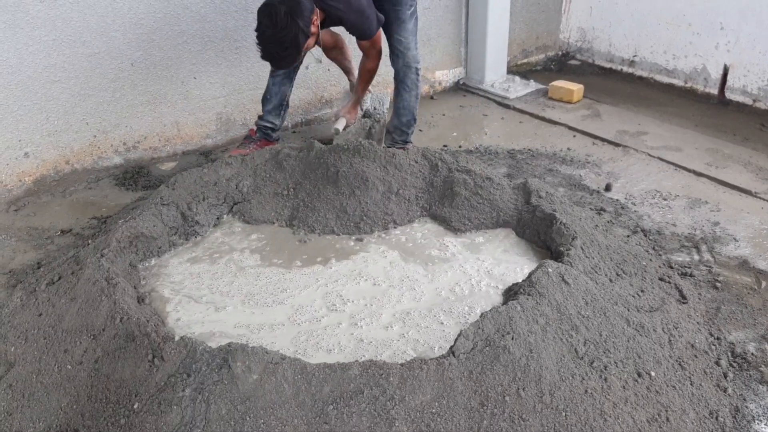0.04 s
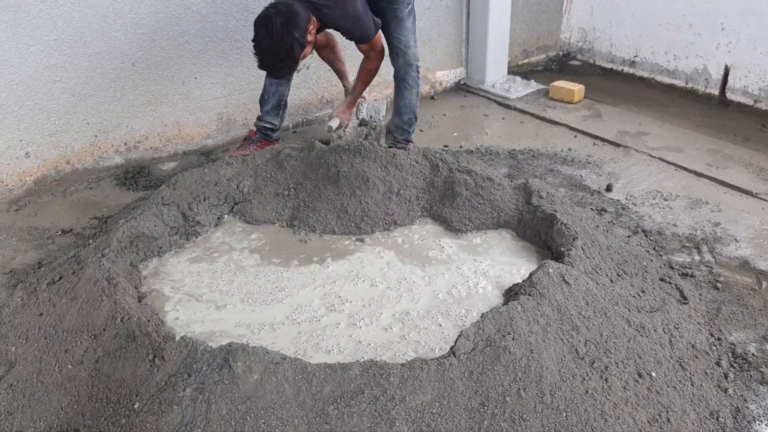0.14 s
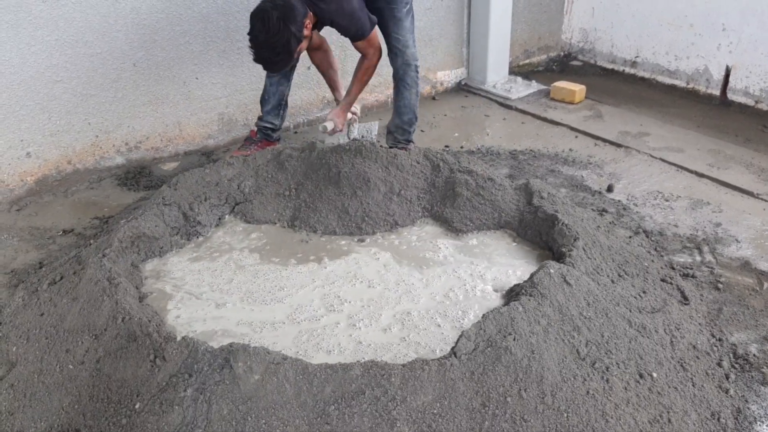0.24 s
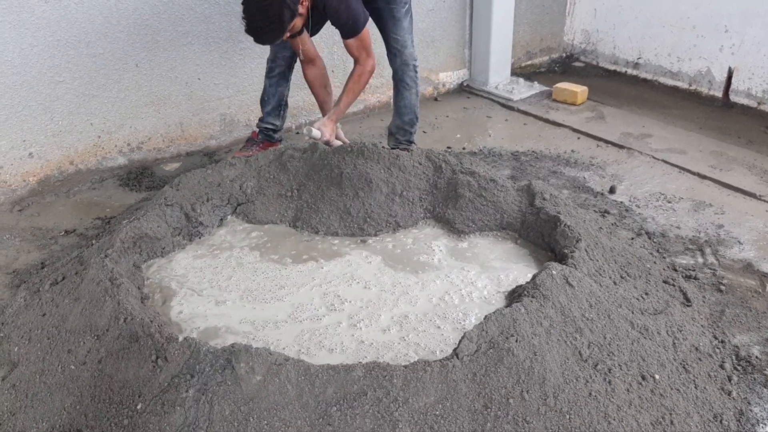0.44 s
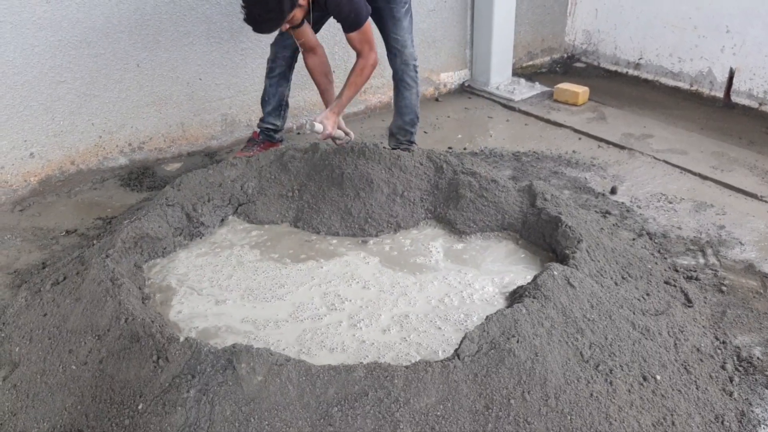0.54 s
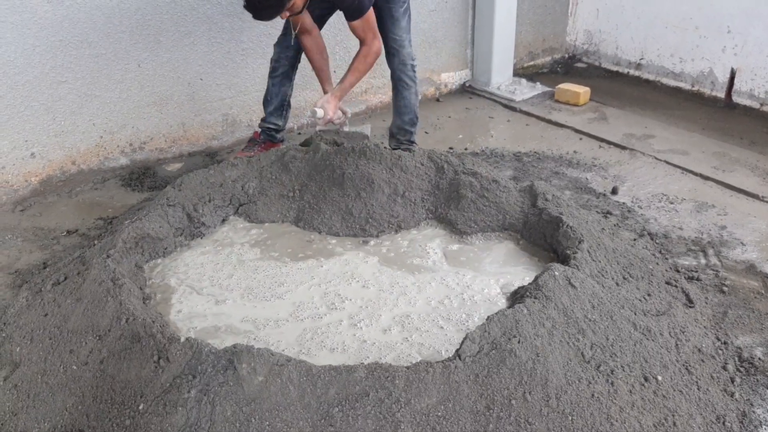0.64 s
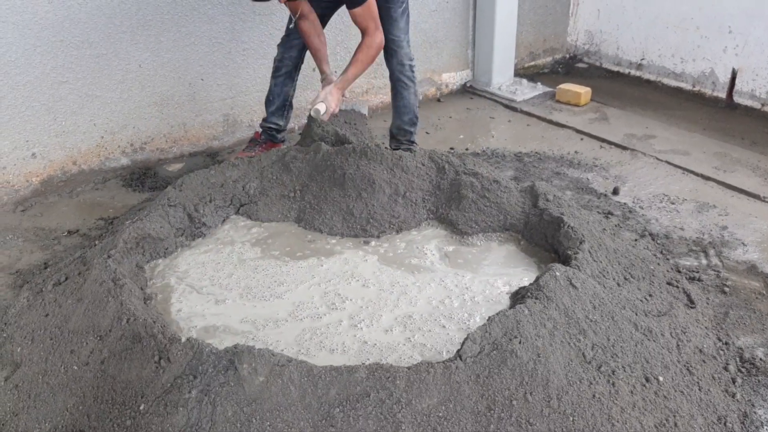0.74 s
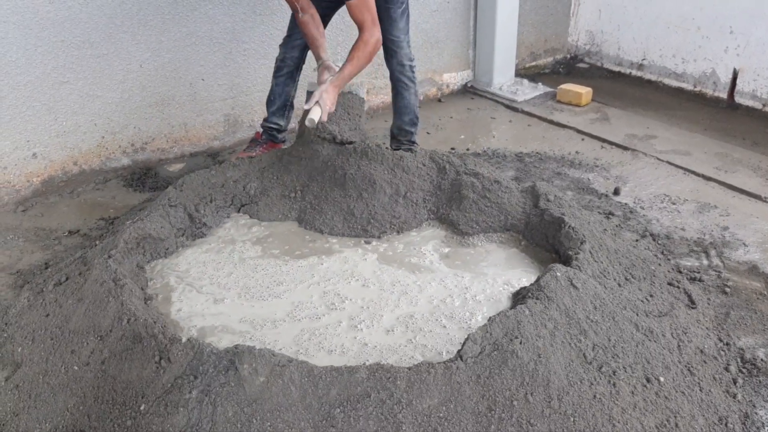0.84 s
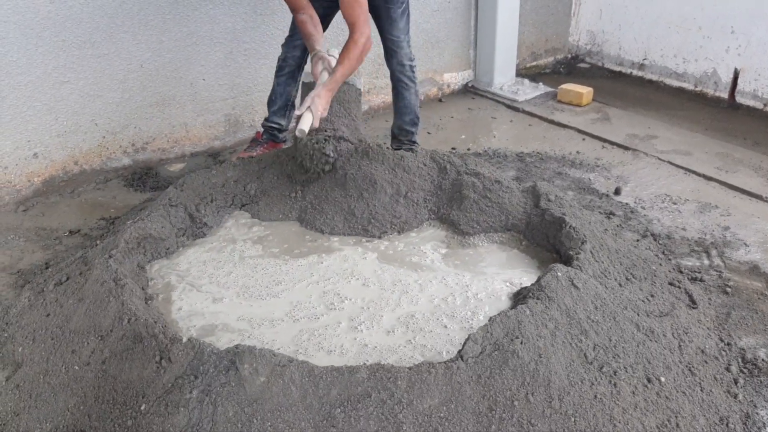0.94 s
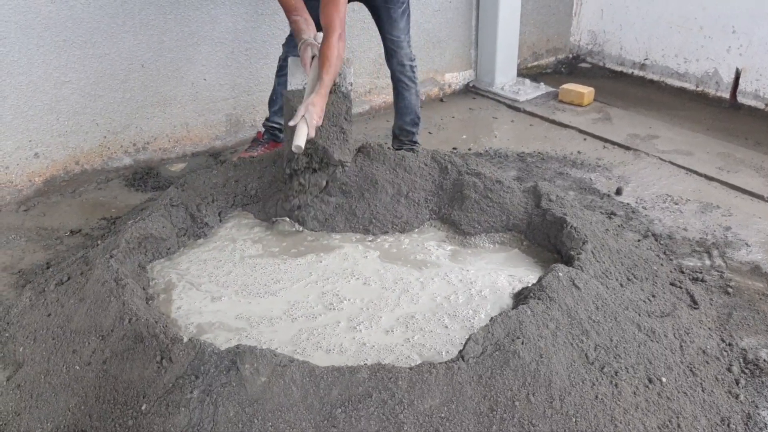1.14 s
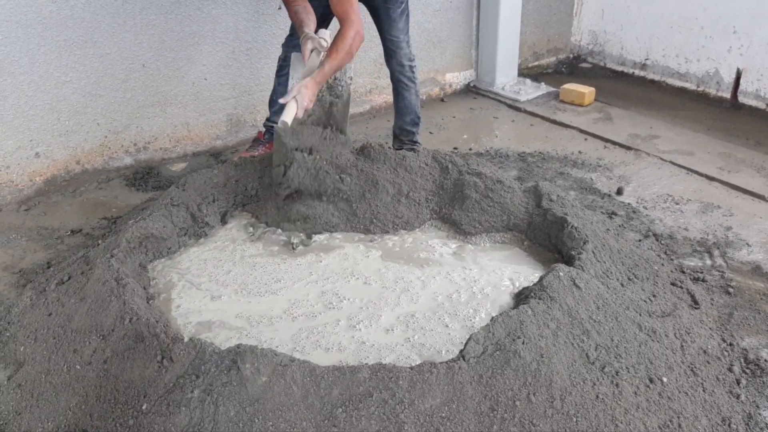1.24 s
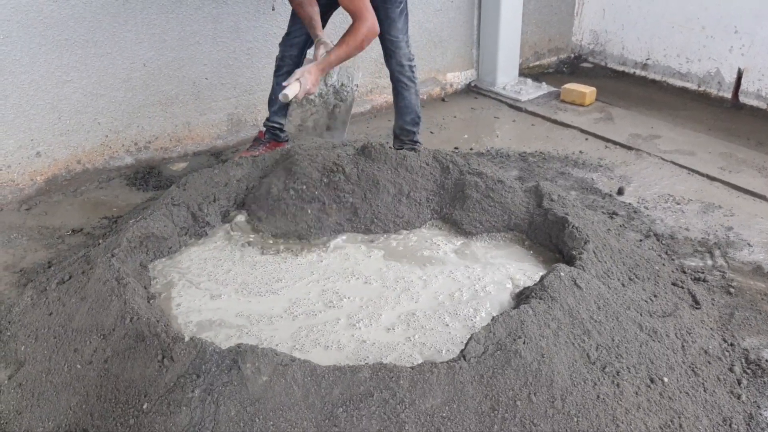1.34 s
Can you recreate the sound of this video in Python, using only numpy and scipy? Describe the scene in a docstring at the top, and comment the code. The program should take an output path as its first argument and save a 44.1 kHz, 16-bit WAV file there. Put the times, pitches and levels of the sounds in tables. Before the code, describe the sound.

A steel shovel knocks and grinds across a concrete floor under damp sand and cement, pauses as the load is lifted, then clods thud softly onto the heap; close stereo microphones, bare-walled building site.

```python
"""Shovel under damp sand

Concrete floor between bare walls on a building site; two microphones close by, the right one nearer.
A short steel shovel touches down, bites and grinds under a heap of damp sand and cement: random grit
clicks drive the grind, the blade's ring and the hiss, which is muffled as the blade fills.
The load is lifted with two faint bumps and tipped: clods thud on the heap, the last sand trickles off.
All of it reaches the pair as shaded direct sound with wall and floor echoes, over a dull background."""
import sys
import numpy as np
from scipy import signal
from scipy.fft import rfft, irfft
from scipy.io import wavfile
from scipy.ndimage import uniform_filter1d

SR = 44100
rng = np.random.default_rng(int(sys.argv[2]) if len(sys.argv) > 2 else 0)


def generate_wav(sig):
    """Save sig (samples, or channels by samples) to the path in sys.argv[1] as 16-bit PCM at SR."""
    pcm = np.round(np.clip(np.atleast_2d(sig).T, -1, 1) * 32767).astype(np.int16)
    wavfile.write(sys.argv[1], SR, pcm)


N = 61739  # length in samples, 1.4 s
T = np.arange(N) / SR


def amp(db):
    """Decibels to gain."""
    return 10 ** (np.asarray(db) / 20)


def unit(x):
    """Scales to rms 1."""
    return x / np.sqrt(np.mean(x ** 2) + 1e-20)


def read(points, hz):
    """Reads a table on a log-frequency axis."""
    f, value = np.transpose(points)
    return np.interp(np.log(hz + 1), np.log(f + 1), value)


def level(points):
    """Gain along a level curve, falling 900 dB per second outside it."""
    s, db = np.transpose(points)
    outside = np.maximum(s[0] - T, 0) + np.maximum(T - s[-1], 0)
    return amp(np.interp(T, s, db) - 900 * outside)


def impulse(points, tilt_db=0, size=4096):
    """Minimum-phase impulse of energy 1 with the given colour, tilted in dB per octave."""
    hz = np.fft.rfftfreq(size, 1 / SR)
    db = read(points, hz) + tilt_db * np.log2((hz + 50) / 1000)
    # folding the cepstrum onto positive time makes the impulse causal
    cepstrum = irfft(np.log(amp(db)))
    cepstrum[1:size // 2] *= 2
    cepstrum[size // 2 + 1:] = 0
    h = irfft(np.exp(rfft(cepstrum)))
    return h / np.linalg.norm(h)


def through(x, h):
    """Convolves and keeps the scene's length."""
    return signal.fftconvolve(x, h)[:N]


def grains(per_s, spread_db):
    """Random clicks of uneven size and either sign, rms 1."""
    size = amp(spread_db * np.minimum(rng.exponential(1, N), 3.5))
    sign = rng.choice([-1., 1.], N)
    struck = rng.random(N) < per_s / SR
    return unit(size * sign * struck)


def judder(hz, depth_db):
    """Irregular stick and slip, fluctuating mostly around hz, as a gain of rms 1."""
    f = np.fft.rfftfreq(N, 1 / SR)
    slow = irfft(rfft(rng.standard_normal(N)) * (f / hz) * np.exp(-f / hz), N)
    return unit(amp(depth_db * unit(slow)))


# likeness of the left and right microphones: f/Hz, likeness [0 to 1]
MIC_LIKENESS = [(60, 0.78), (250, 0.75), (640, 0.47), (1400, 0.083), (4000, 0.066), (15000, 0.014)]


def pair(x):
    """Mixes two unrelated channels so they are alike in the bass, as at close microphones."""
    size = x.shape[1]
    likeness = np.clip(read(MIC_LIKENESS, np.fft.rfftfreq(size, 1 / SR)), 0, 1)
    turn = np.arcsin(likeness) / 2
    spectra = rfft(x)
    return irfft(np.cos(turn) * spectra + np.sin(turn) * spectra[::-1], size)


# colour of the site's background: f/Hz, relative level/dB per Hz
AIR_COLOUR = [(25, -17), (50, -19), (85, 5.5), (150, -13), (300, -11.5), (700, -13), (1400, -19),
              (4000, -24.5), (8000, -28.5), (10000, -37), (16000, -35)]
# background, midway between the two microphones: t/s, level/dB
AIR_LEVEL = [(0, -45.5), (0.18, -46), (0.6, -49.5), (0.86, -53.5), (1.4, -52.5)]


def air(right_db=3):
    """Dull building-site background: coloured noise, stronger at the right microphone."""
    noise = pair(np.array([through(rng.standard_normal(N), impulse(AIR_COLOUR)) for side in range(2)]))
    balance = amp(np.array([[-.5], [.5]]) * right_db)
    return noise * level(AIR_LEVEL) * balance


# short swishes and crunches: scuffs, the bite, pattering soil, sliding sand and a last tap:
# t/s, rise/s, fade t60/s, level/dB, centre f/Hz, width/octaves
SWISHES = [(0.0, 0.11, 1.2, -56.5, 2740, 1.6), (0.098, 0.0086, 0.088, -35.5, 2640, 0.81),
           (0.204, 0.0057, 0.15, -31.5, 1780, 0.13), (0.287, 0.002, 0.05, -26, 5260, 0.24),
           (0.29, 0.0075, 0.12, -26, 1250, 0.45), (0.412, 0.018, 0.1, -28, 1390, 0.46),
           (0.903, 0.023, 0.31, -54, 706, 1.1), (1.166, 0.029, 0.54, -50.5, 1065, 0.94),
           (1.19, 0.02, 0.54, -56.5, 2180, 0.14), (1.387, 0.0074, 0.15, -46.5, 1550, 0.47)]


def swishes(skirt_db=-24):
    """Short swishes and crunches: random grains, each in a soft-edged band, that swell and fade."""
    out = np.zeros(N)
    hz = np.fft.rfftfreq(N, 1 / SR)
    for s, rise, t60, db, centre_hz, octaves in SWISHES:
        away = np.log2((hz + 1) / centre_hz)
        band = np.exp(-.5 * (away / octaves) ** 2) + amp(skirt_db) / (1 + away ** 2)
        swish = unit(irfft(rfft(grains(per_s=5000, spread_db=4.5)) * band, N))
        swell = np.clip((T - s) / rise, 0, 1)
        fade_db = -60 * np.maximum(T - s - rise, 0) / t60
        out += swish * swell * amp(db + fade_db)
    return out


# crushed sand's hiss: t/s, level/dB
HISS_LEVEL = [(0.18, -78), (0.186, -65), (0.212, -32.5), (0.268, -48.5), (0.296, -28.5), (0.328, -36.5),
              (0.34, -37.5), (0.352, -32.5), (0.364, -27.5), (0.444, -33.5), (0.458, -41), (0.48, -29),
              (0.6, -86)]
# sand under the open blade: f/Hz, relative level/dB per Hz
OPEN_SAND = [(500, -26), (2000, -3), (3500, 2), (5500, -2), (8700, -3), (10000, -9.5), (12500, -4),
             (16000, -13)]
# sand under the covered blade: f/Hz, relative level/dB per Hz
COVERED_SAND = [(500, -17), (2000, 2.5), (3500, -4.5), (5500, 0.5), (8500, -4.5), (10000, -11.5),
                (12500, -10), (16000, -22)]
FILL_S, FILL_TIME_S = 0.425, 0.027  # middle and length of the change from open to covered


def crush(slip):
    """Breaking grains hiss in step with the slipping blade, and dull as it fills."""
    crushed = grains(per_s=6400, spread_db=6.5) * slip * level(HISS_LEVEL)
    full = np.clip((T - FILL_S) / FILL_TIME_S + .5, 0, 1)
    return through(crushed * (1 - full), impulse(OPEN_SAND)) + through(crushed * full, impulse(COVERED_SAND))


# mix being shoved and lifted, before the function's gain: t/s, level/dB
SHOVE_LEVEL = [(0.18, -50.5), (0.214, -37.5), (0.28, -38), (0.3, -35), (0.33, -39), (0.48, -34),
               (0.535, -32.5), (0.59, -35.5), (0.66, -47), (0.69, -49), (0.75, -50), (0.83, -67.5),
               (0.9, -76)]
# colour of the moving load: f/Hz, relative level/dB per Hz
RUMBLE_COLOUR = [(25, -37), (45, -20), (70, 1.5), (110, 1.5), (165, -2), (225, -1.5), (330, -2.5),
                 (600, -21.5), (2000, -54), (8000, -52)]


def rumble(gain_db=-3):
    """The shoved and lifted load rumbles as many small low-pitched bumps."""
    bumps = grains(per_s=620, spread_db=0.7) * level(SHOVE_LEVEL)
    return amp(gain_db) * through(bumps, impulse(RUMBLE_COLOUR))


# ringing of the shaft and blade: f/Hz, relative level/dB, t60/s
BLADE_MODES = [(190.5, -1, 0.05), (346.6, 1.5, 0.072), (609, 1, 0.097), (782, -17, 0.15), (857, -4, 0.11),
               (1210, 1, 0.027), (1316, -1.5, 0.044), (1585, 6.5, 0.027), (1714, 10, 0.021),
               (1900, -34, 0.049), (2040, -12, 0.11)]


def blade():
    """Ring of the sand-damped steel: decaying modes at random phase, energy 1."""
    t = T[:SR // 3]
    ring = np.zeros(len(t))
    for hz, db, t60 in BLADE_MODES:
        decay = 1000 ** (-t / t60)
        ring += amp(db) * decay * np.sin(2 * np.pi * (hz * t + rng.random()))
    return ring / np.linalg.norm(ring)


# force of the blade on the floor, before the function's gains: t/s, level/dB
PRESS_LEVEL = [(0.19, -59), (0.214, -33), (0.246, -37.5), (0.286, -31.5), (0.298, -30.5), (0.354, -24.5),
               (0.434, -24), (0.444, -32), (0.482, -20.5), (0.518, -40.5), (0.536, -33), (0.56, -58),
               (0.68, -87)]
# colour of grit under the edge: f/Hz, relative level/dB per Hz
GRIND_COLOUR = [(80, -43.5), (200, -13.5), (400, -3.5), (600, 4), (850, 4), (1050, -5), (1350, 4),
                (2000, -4), (2600, -7.5), (5000, -18.5), (9000, -21), (16000, -45)]


def grind(ring, slip, grit_db=-2, ring_db=-7):
    """Grit catches under the slipping edge, grating and shaking the blade into ringing."""
    catches = grains(per_s=1800, spread_db=2.5) * slip * level(PRESS_LEVEL)
    return amp(grit_db) * through(catches, impulse(GRIND_COLOUR)) + amp(ring_db) * through(catches, ring)


# blade striking the floor or a stone: t/s, click level/dB, brightness/dB per octave
KNOCKS = [(0.212, -11, 4), (0.2607, -19, 2), (0.2938, 2, -8.5), (0.2971, -19, 3), (0.3, -2.5, 0.5),
          (0.31, 0.5, -0.5), (0.3419, -1, 5), (0.427, -5, 2.5), (0.482, -20.5, -7), (0.549, -13, -1.5)]
# colour of a knock before its brightness tilt: f/Hz, relative level/dB per Hz
KNOCK_COLOUR = [(50, -22.5), (130, -2), (350, -4), (500, -7.5), (800, 9.5), (1100, -2.5), (1600, 5.5),
                (2000, -23.5), (5500, -12), (10000, -24.5), (16000, -24)]


def knocks(ring, crunch_s=0.0016, crunch=0.87, ring_db=-11):
    """Each knock is a click with a short decaying crunch of noise, ringing the blade."""
    out = np.zeros(N)
    for s, db, tilt_db in KNOCKS:
        burst = rng.standard_normal(N) * np.exp(-T / crunch_s)
        burst *= crunch / np.linalg.norm(burst)
        burst[0] += 1  # the click
        at = round(s * SR)
        out[at:] += amp(db) * through(burst, impulse(KNOCK_COLOUR, tilt_db))[:N - at]
    return out + amp(ring_db) * through(out, ring)


# pressed shovel shuddering at its lowest resonance: t/s, level/dB
SHUDDER_LEVEL = [(0.28, -36), (0.297, -28), (0.37, -33.5), (0.42, -34.5), (0.48, -36), (0.53, -43)]


def shudder(centre_hz=186, wander_hz=17.7):
    """Stick and slip keep the shovel flexing at an unsteady low pitch."""
    wander = unit(uniform_filter1d(rng.standard_normal(N), size=300))
    hz = centre_hz + wander_hz * wander
    flex = unit(np.sin(2 * np.pi * np.cumsum(hz) / SR))
    return flex * judder(hz=26.7, depth_db=3.5) * level(SHUDDER_LEVEL)


# two faint low bumps as the load is lifted, then larger clods landing,
# before the function's gain: t/s, level/dB
BUMPS_AND_CLODS = [(0.729, -33), (0.751, -35), (0.951, -6.5), (0.977, -3), (1.029, -6.5), (1.066, -10.5),
                   (1.082, -10), (1.114, -14), (1.218, -15.5), (1.25, -21), (1.303, -11)]
# smaller lumps landing on the heap, before the function's gain: t/s, level/dB
PATTER_LEVEL = [(0.9, -63), (0.94, -27.5), (0.975, -28), (1.08, -34.5), (1.13, -37), (1.16, -56),
                (1.22, -38), (1.28, -48), (1.315, -64), (1.34, -61), (1.4, -63)]
# colour of a soft low blow: f/Hz, relative level/dB per Hz
THUD_COLOUR = [(25, -35), (42, -21), (56, 1), (72, 5.5), (115, -1), (170, -4.5), (230, -20), (350, -20.5),
               (900, -42), (2500, -42.5), (8000, -63.5)]
# sand trickling off the blade: t/s, level/dB
TRICKLE_LEVEL = [(0.91, -70), (0.965, -58.5), (1.02, -64), (1.1, -60), (1.17, -60), (1.25, -54),
                 (1.28, -60), (1.305, -54.5), (1.33, -65), (1.4, -56)]
# colour of the trickle: f/Hz, relative level/dB per Hz
TRICKLE_COLOUR = [(500, -6.5), (2300, 2), (3500, 0.5), (6000, 0.5), (8700, -5.5), (10000, -9.5),
                  (12500, -3.5), (16000, -8.5)]


def lift_and_pour(blow_db=-1, patter_db=-3):
    """Two faint lifting bumps, then clods thud on the heap among smaller lumps and a thin trickle."""
    blows = amp(patter_db) * grains(per_s=700, spread_db=2.9) * level(PATTER_LEVEL)
    for s, db in BUMPS_AND_CLODS:
        blows[round(s * SR)] += amp(db + blow_db)
    trickle = through(grains(per_s=2700, spread_db=5) * level(TRICKLE_LEVEL), impulse(TRICKLE_COLOUR))
    return through(blows, impulse(THUD_COLOUR)) + trickle


# decay of the tail between the bare walls: f/Hz, t60/s
WALLS = [(80, 0.3), (300, 0.24), (1000, 0.31), (4000, 0.33), (12000, 0.19)]


def echoes(early_db=1.5, early_s=0.0079, early_low_hz=450, tail_db=-6):
    """Quick sparse echoes from floor and wall and a short noise tail, for each microphone."""
    t, hz = T[:SR], np.fft.rfftfreq(SR, 1 / SR)
    early = rng.standard_normal((2, SR)) * (rng.random((2, SR)) < 2500 / SR) * np.exp(-t / early_s)
    early /= np.linalg.norm(early, axis=1, keepdims=True)
    early = irfft(rfft(early) * hz / np.hypot(hz, early_low_hz), SR)  # thins the bass
    # the tail fades at its own rate in each frequency band
    f, age, z = signal.stft(rng.standard_normal((2, SR)), SR, nperseg=256)
    decay = amp(-60 * age / read(WALLS, f)[:, None])
    tail = signal.istft(z * decay, SR, nperseg=256)[1][:, :SR]
    tail = tail * np.minimum(t / 0.025, 1)
    return pair(amp(early_db) * early + amp(tail_db) * tail / np.linalg.norm(tail[0]))


# the heap hides the blade, so little treble arrives directly: f/Hz, level/dB
DIRECT = [(150, 0.5), (400, 1.5), (800, -2), (1600, -5), (3000, -14.5), (6000, -15), (16000, -34)]
# the right microphone is nearer: f/Hz, right minus left level/dB
RIGHTWARD = [(60, 4.5), (120, 4), (300, 5), (1300, 1), (2400, 5), (4400, 4), (8100, 9.5), (15000, 5.5)]


def room(x, count=6, hold_s=.05):
    """Shaded direct sound plus echo patterns that crossfade in turn as the shovel moves."""
    hz = np.fft.rfftfreq(N, 1 / SR)
    heard = irfft(rfft(x) * amp(read(DIRECT, hz)), N)
    for k in range(count):
        share = np.sin(np.pi / 2 * np.minimum((T / hold_s - k) % count, 2))
        heard = heard + np.array([through(x * share, side) for side in echoes()])
    balance = amp(np.outer([-.5, .5], read(RIGHTWARD, hz)))
    return irfft(rfft(heard) * balance, N)


def scene():
    """The shovel's stroke, the lift and the falling load in the room, over the background."""
    ring = blade()
    slip = judder(hz=60, depth_db=3.5)  # shared by the grit and the crushed sand
    stroke = swishes() + crush(slip) + rumble() + grind(ring, slip) + knocks(ring) + shudder()
    return air() + room(stroke + lift_and_pour())


def record(dry, cut_hz=15950):
    """The recorder's band limit: a steep low-pass."""
    lowpass = signal.firwin(511, cut_hz, window=("kaiser", 9), fs=SR)
    return signal.oaconvolve(dry, lowpass[None], "same")


dry = scene()
out = record(dry)
generate_wav(out)
```